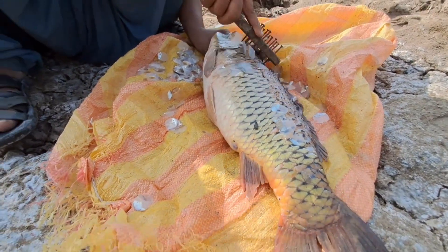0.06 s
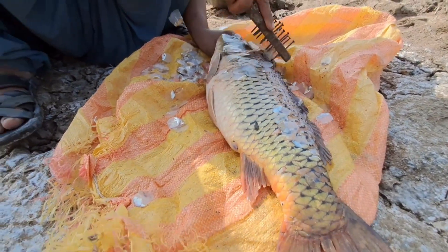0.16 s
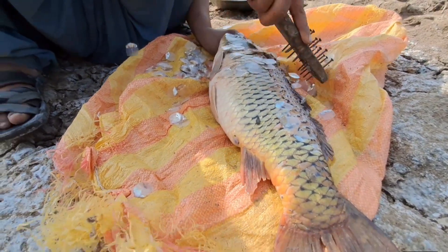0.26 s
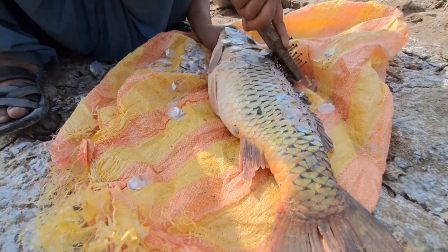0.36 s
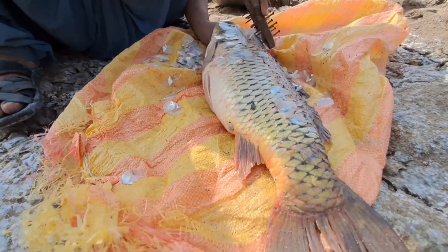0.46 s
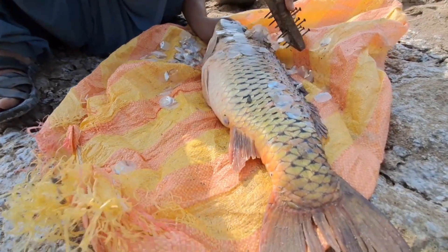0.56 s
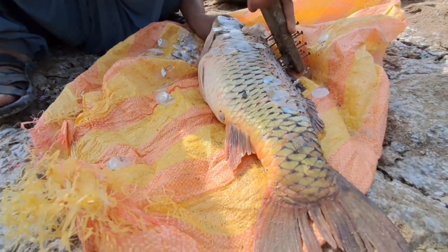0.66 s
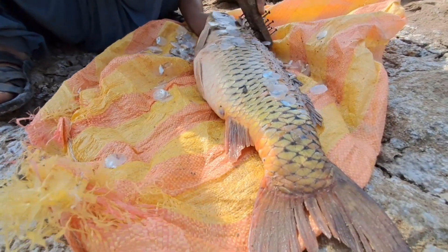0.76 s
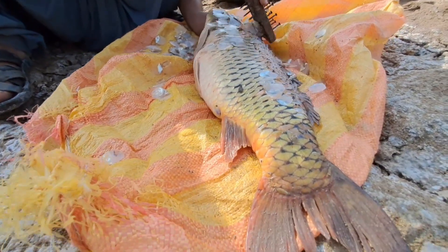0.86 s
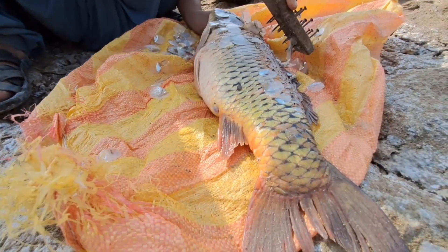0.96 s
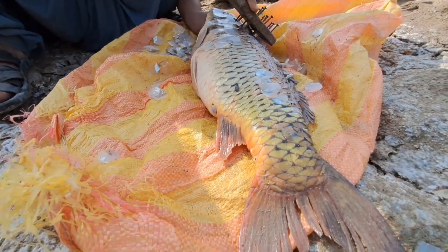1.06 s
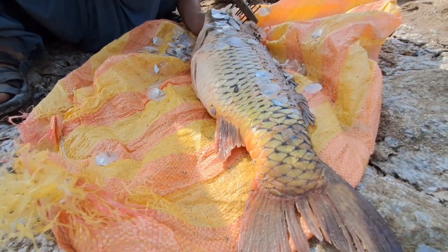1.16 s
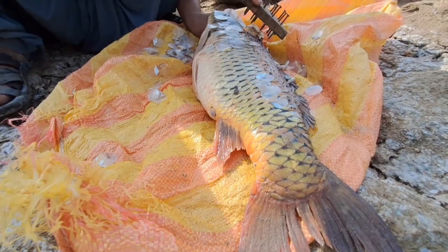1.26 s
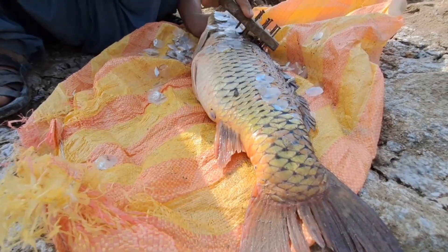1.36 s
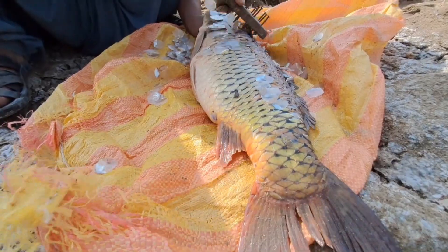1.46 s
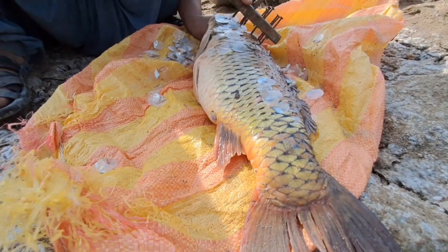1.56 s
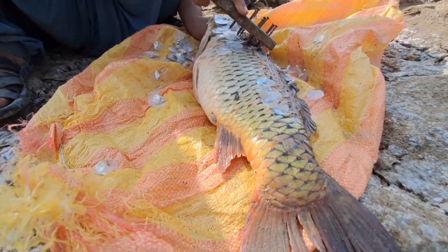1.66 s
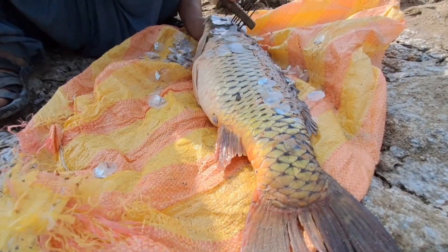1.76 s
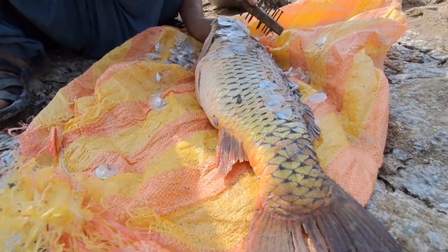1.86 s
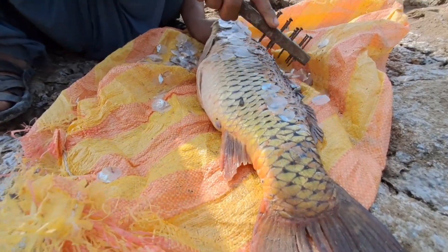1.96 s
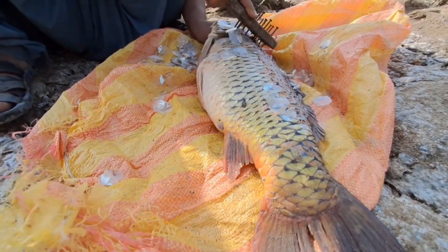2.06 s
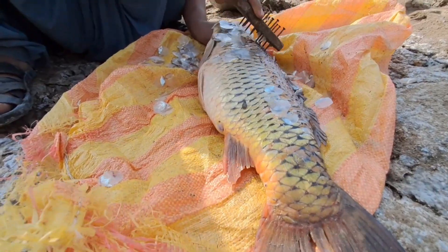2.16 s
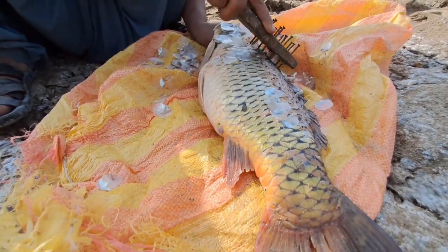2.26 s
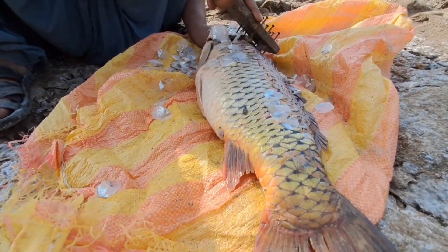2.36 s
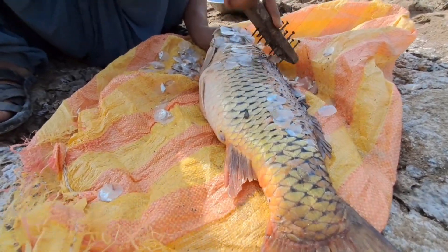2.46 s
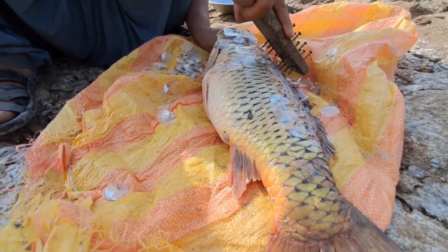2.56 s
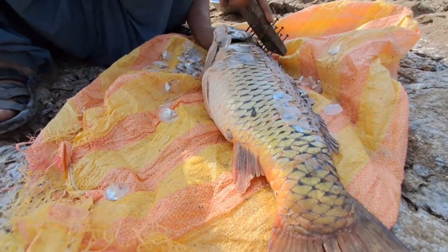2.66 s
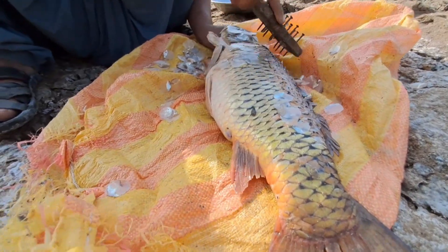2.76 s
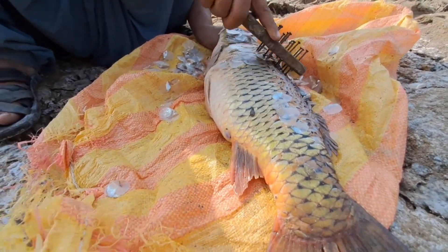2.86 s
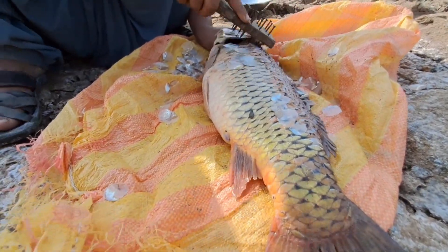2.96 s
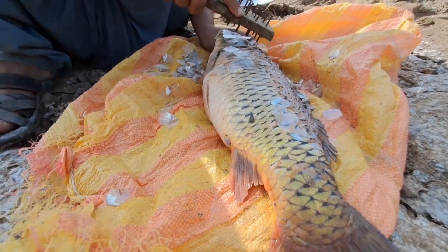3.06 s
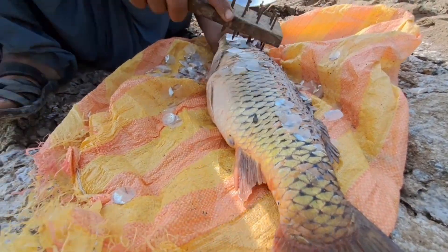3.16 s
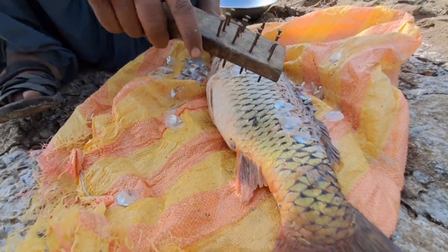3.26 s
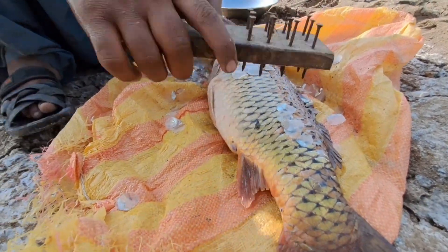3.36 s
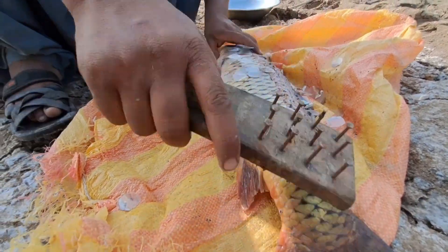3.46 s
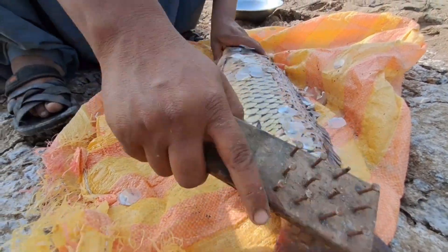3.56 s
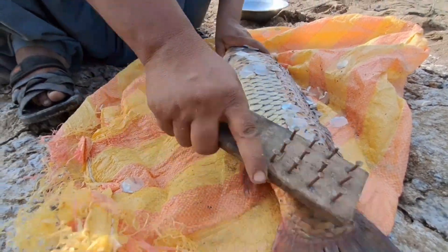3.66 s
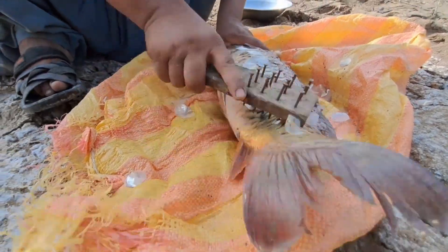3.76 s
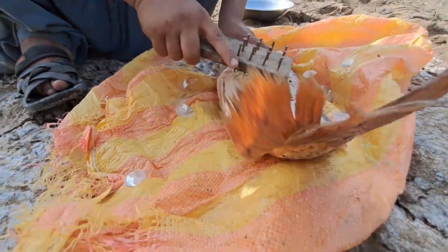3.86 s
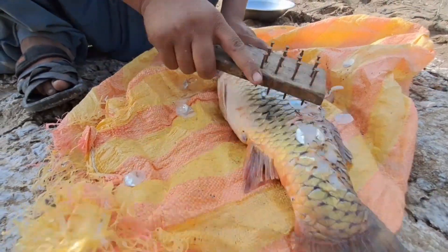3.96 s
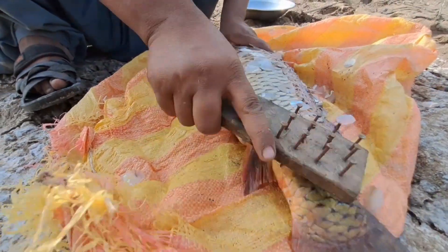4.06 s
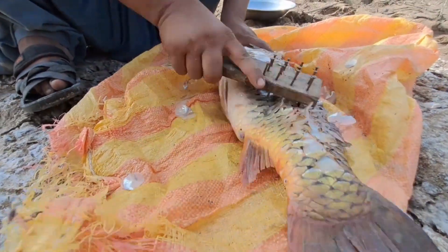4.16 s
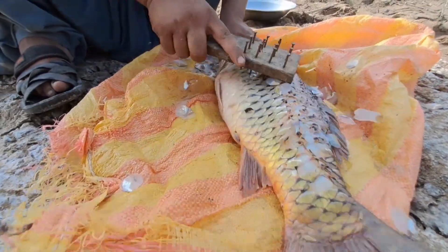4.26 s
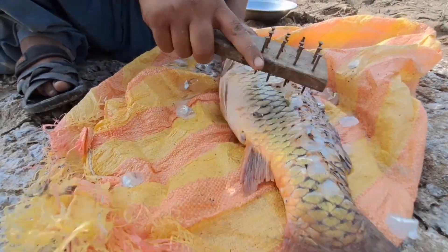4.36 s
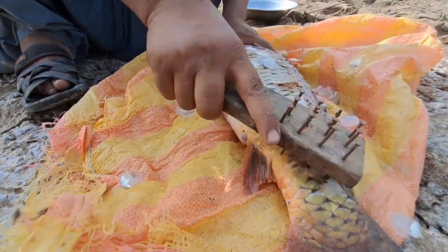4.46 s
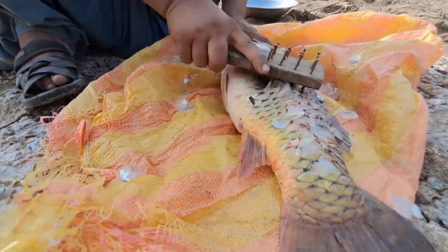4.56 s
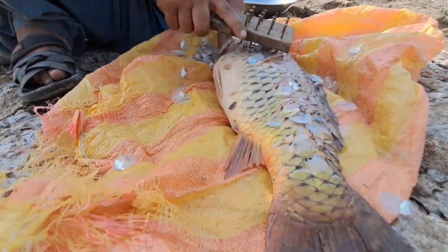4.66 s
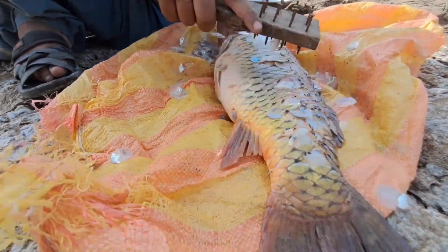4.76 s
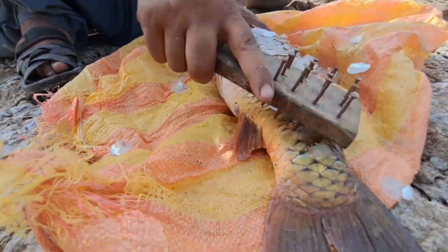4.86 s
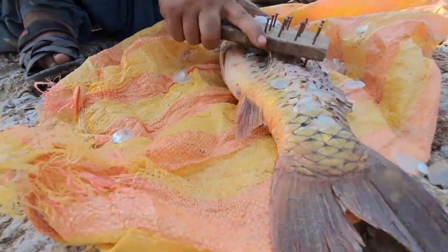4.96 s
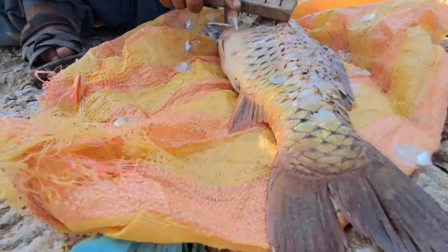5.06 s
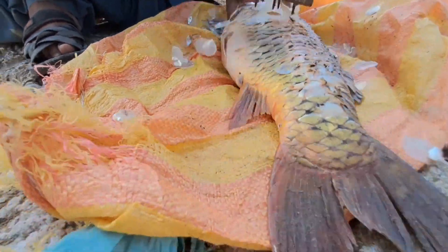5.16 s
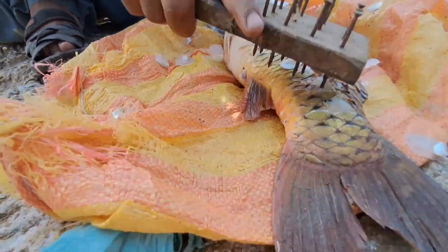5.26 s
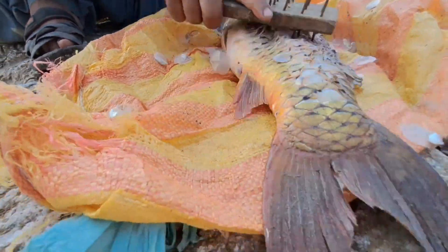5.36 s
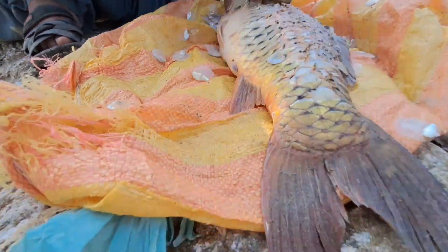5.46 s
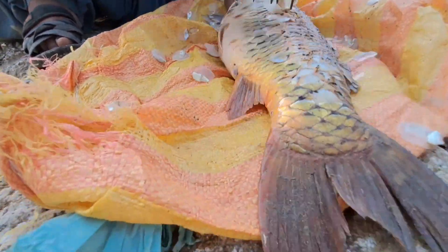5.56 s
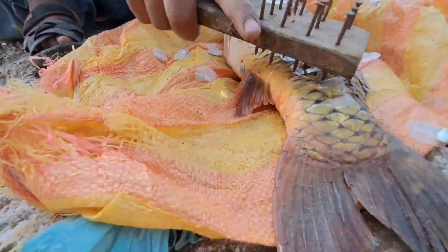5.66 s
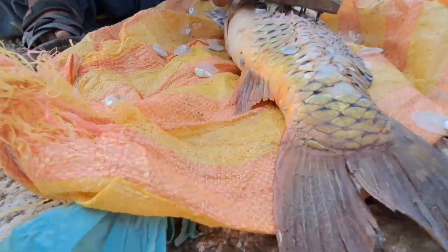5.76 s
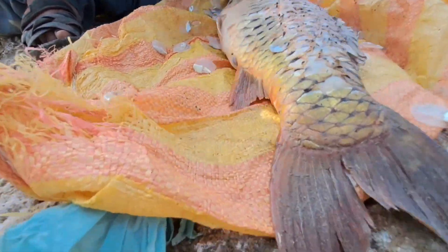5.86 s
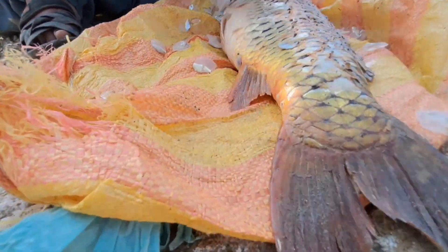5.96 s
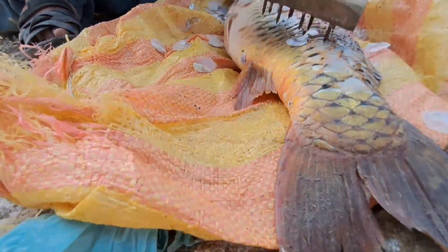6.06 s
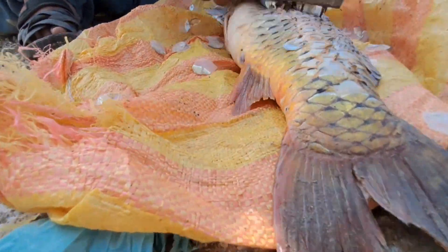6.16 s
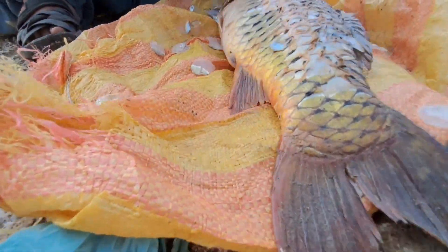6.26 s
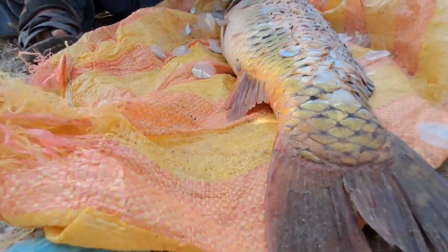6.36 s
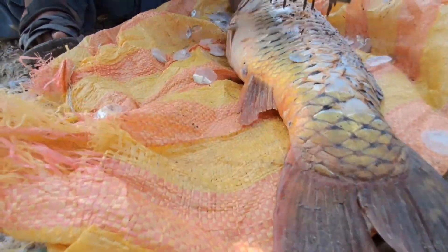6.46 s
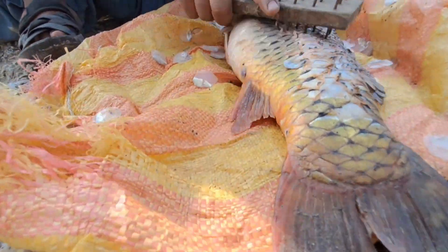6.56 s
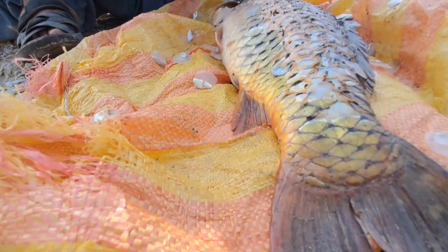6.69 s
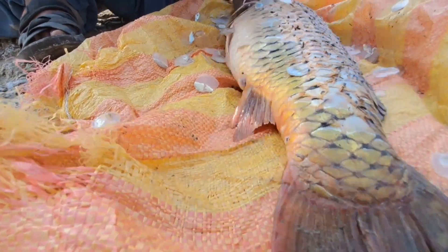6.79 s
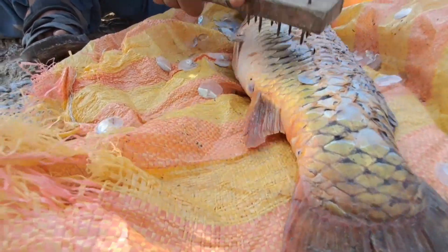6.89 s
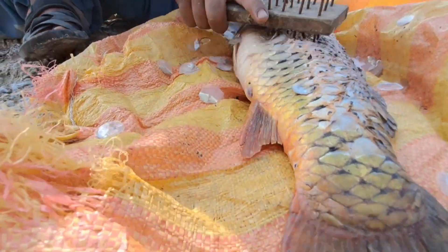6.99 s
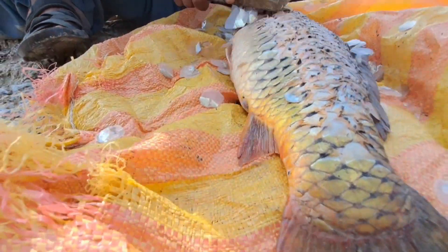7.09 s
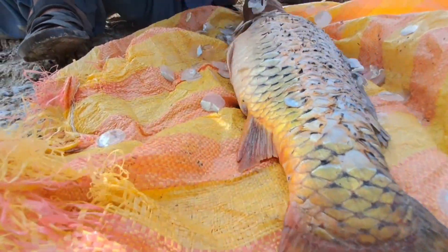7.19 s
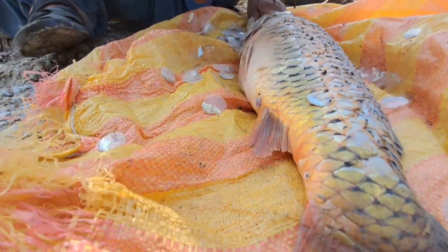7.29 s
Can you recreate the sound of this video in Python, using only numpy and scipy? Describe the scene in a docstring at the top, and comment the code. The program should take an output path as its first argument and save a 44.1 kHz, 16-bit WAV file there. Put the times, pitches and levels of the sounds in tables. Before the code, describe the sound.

A large fish is scaled outdoors with a wooden board set with nails. Quick, bright scraping strokes crackle right by the microphone, each with sharp snaps of scales and a dull bump of wood on flesh. The strokes stop for a moment, then carry on harder and slightly slower. Underneath are the faint rustle of a woven plastic sack, far-off birds and a thin hiss.

```python
"""Outdoors in an open yard, close to the microphone: a nail-studded board is dragged over a big carp lying on a
woven sack. Each stroke flicks up hundreds of stiff scales that crack and ring briefly, while the board knocks
and the soft body thuds under the nails. Between strokes the sack crinkles. Small birds chirp nearby, and others
chatter far off, over a low rumble and a thin hiss."""
import sys
import numpy as np
from scipy import signal
from scipy.fft import rfft, irfft
from scipy.io import wavfile
from scipy.ndimage import uniform_filter1d, map_coordinates

SR = 44100
rng = np.random.default_rng(int(sys.argv[2]) if len(sys.argv) > 2 else 0)


def write(x):
    x = np.atleast_2d(x).T
    wavfile.write(sys.argv[1], SR, np.round(np.clip(x, -1, 1) * 32767).astype(np.int16))


N = 323253
T = np.arange(N) / SR

# strokes of the board: start_s, bite_s, drag_s, lift_s, rasp_db, body_db, board_db, treble_db,
# left_minus_right_db, sack_db
BOARD_STROKES = [(0.0, 0.015, 0.078, 0.036, -27.5, -39.5, -32, -4.5, -1.5, -56),
                 (0.357, 0.0066, 0.1, 0.039, -31, -40.5, -38.5, 0.0, -1, -49.0),
                 (0.672, 0.029, 0.099, 0.014, -30, -41.0, -41.5, 1, -1, -53),
                 (1.015, 0.045, 0.079, 0.035, -30.0, -41, -41, 0.0, -1, -66),
                 (1.365, 0.026, 0.021, 0.027, -31, -39, -42, 0, -1, -45),
                 (1.651, 0.033, 0.076, 0.0075, -30.0, -39, -41, -1.5, -1, -67),
                 (2.001, 0.07, 0.0087, 0.053, -24, -34.0, -34, -3, -2.5, -58),
                 (2.28, 0.025, 0.043, 0.019, -32, -43.5, -44.5, -1.5, -1.5, -56.5),
                 (2.584, 0.03, 0.027, 0.0099, -29, -39, -47, -1, -1.5, -56),
                 (2.878, 0.062, 0.038, 0.022, -33.5, -41, -47, 4.5, -2, -65),
                 (3.659, 0.05, 0.12, 0.053, -22, -59, -79, -4.5, -1, -56),
                 (3.968, 0.012, 0.0042, 0.02, -29.5, -41, -29.5, 18, 1, -48),
                 (4.101, 0.044, 0.044, 0.056, -20, -40, -36, -3.5, -0.5, -67),
                 (4.501, 0.035, 0.095, 0.055, -21.5, -38.5, -35, -3, -1, -56.5),
                 (4.914, 0.035, 0.087, 0.051, -22, -36.5, -31.5, -2, -1, -52.5),
                 (5.309, 0.052, 0.063, 0.046, -21, -36.5, -32, 0, -0.5, -53.5),
                 (5.637, 0.0054, 0.02, 0.019, -38.5, -67.5, -60, 3.5, -1.5, -49),
                 (5.699, 0.05, 0.066, 0.13, -26, -37, -34, -1, -1.0, -66),
                 (6.111, 0.036, 0.15, 0.046, -26.5, -37, -34.5, -2.5, -1.0, -58),
                 (6.538, 0.033, 0.091, 0.11, -24.5, -37, -37, 0, -0.5, -48),
                 (6.934, 0.061, 0.064, 0.16, -23.5, -37, -35, -3.5, -1.5, -61.5)]
# big scales tearing loose: start_s, level_db, ring_hz
SCALE_SNAPS = [(.057, -19, 3100), (0.0842, -14.5, 3610), (.231, -46, 3100), (.3317, -30.5, 5340),
               (0.3721, -14, 5400), (0.4448, -10, 4740), (0.711, -24, 4800), (0.795, -13.5, 5550),
               (0.849, -30, 2950), (.858, -30, 3580), (0.8883, -28.5, 3080), (1.085, -16, 4150),
               (1.2586, -41, 3880), (1.4312, -22.5, 3540), (1.6631, -26, 4660), (1.7, -12.5, 3930),
               (1.753, -24, 3700), (2.008, -30, 3520), (2.033, -21, 4300), (2.0526, -14, 3220),
               (2.067, -14, 3060), (2.295, -26, 4700), (2.597, -23.5, 4800), (2.6204, -33, 4570),
               (2.6902, -14, 3430), (2.895, -25, 4500), (3.6275, -31, 3140), (3.7272, -8, 3200),
               (3.7373, -3.5, 4570), (3.7574, -10, 4360), (3.7921, -14, 4800), (3.83, -18, 3660),
               (3.9819, -22, 4420), (4.115, -16.5, 4560), (4.1807, -13.5, 4400), (4.2181, -7, 3500),
               (4.2787, -27, 3240), (4.583, -12, 4200), (4.619, -8, 3900), (4.7246, -33, 4020),
               (4.9312, -23, 4600), (5.023, -7.5, 3000), (5.073, -20, 2700), (5.3472, -30, 3100),
               (5.4991, -27.5, 4300), (5.647, -26, 5200), (5.8, -9.5, 4300), (5.824, -11.5, 4000),
               (5.8746, -7.5, 3330), (5.925, -30, 4570), (6.083, -30, 4900), (6.162, -12, 4800),
               (6.185, -9.5, 4430), (6.2105, -19, 3960), (6.2678, -15.5, 3980), (6.299, -20, 3800),
               (6.324, -18.5, 3900), (6.5685, -20, 3580), (6.5932, -14, 5010), (6.646, -6.5, 4070),
               (6.727, -16.5, 3810), (6.764, -26, 3900), (7.0031, -10.5, 3580), (7.0804, -10.5, 3940),
               (7.1041, -10, 5030), (7.113, -5.5, 3790), (7.143, -18.5, 4340), (7.164, -15.5, 4600),
               (7.184, -28, 3820)]
# spectrum of cracking scales: frequency_hz, level_db
SCALE_SPECTRUM = [(700, -30.5), (1300, -19.5), (2000, -22), (2750, -4.5), (3080, -2), (3700, -2.5),
                  (4900, -4), (5700, -5), (6500, -4.5), (7600, -9), (9400, -12), (11400, -10),
                  (12300, -6.5), (14000, -13), (16000, -13)]
# spectrum of the thudding body: frequency_hz, level_db
BODY_SPECTRUM = [(20, -36.5), (50, -3), (110, 0), (220, 1.5), (330, -4.5), (450, 1), (630, -5), (800, -6),
                 (1300, -18.5), (2200, -44.5), (4000, -38.5)]
# resonances of the wooden board: pitch_hz, width_hz, level_db
BOARD_MODES = [(1043, 400, 1), (1580, 220, -3.5), (2025, 300, 3), (2420, 83, 4)]
# the board bumping the wet flank: start_s, level_db, pitch_hz
FLANK_BUMPS = [(.085, -17.5, 262), (1.085, -19.5, 535), (1.406, -24, 538), (2.074, -18.5, 539),
               (2.347, -33, 400), (2.636, -22.5, 547), (2.969, -21, 527), (2.974, -23.5, 590),
               (3.736, -28.5, 200), (4.21, -32, 250), (4.32, -32.5, 820), (4.62, -21, 257),
               (5.036, -23, 250), (5.826, -23.5, 270), (5.872, -22.5, 292), (6.676, -20, 248),
               (6.727, -26.5, 387)]
# modes of the hollow flank: pitch_ratio, level_db, t60_s
FLANK_MODES = [(.45, -13, .03), (1, -1.5, 0.027), (1.2, -7, 0.037), (1.82, -5, .032)]
# the flank droning where the nails bite deep: centre_s, length_s, pitch_hz, level_db
FLANK_DRONES = [(5.757, 0.014, 410, -28.5), (6.17, 0.037, 580, -33), (6.584, 0.04, 570, -36.5),
                (7.004, 0.023, 555, -34.5)]
# brief pings of snapping scales, wet squeaks and faint low tones:
# start_s, length_s, start_hz, middle_hz, end_hz, level_db
SHORT_TONES = [(3.7262, 0.0067, 3300, 3020, 3140, -12), (4.279, 0.016, 3300, 3140, 3250, -39),
               (5.652, 0.023, 4250, 4980, 5100, -30), (6.938, 0.044, 3040, 3100, 2950, -32),
               (1.365, .13, 253, 214.6, 171, -40.5), (1.48, 0.14, 172, 148.6, 134, -52.5),
               (3.22, 0.24, 770, 730, 704, -75), (6.41, 0.097, 360, 381, 385, -57.5),
               (7.24, 0.11, 333, 344, 360, -61)]
# the sack shifting as the hands change their hold: centre_s, length_s, level_db
SACK_RUSTLES = [(3.212, 0.26, -61), (3.634, 0.09, -63), (4.313, 0.041, -45), (6.459, 0.22, -73)]
# harsh bird calls, far off: centre_s, length_s, pitch_hz, level_db
BIRD_CALLS = [(0.246, 0.29, 2770, -55), (0.509, 0.075, 2460, -48.5), (0.86, 0.13, 2116, -49.5),
              (0.995, 0.088, 3040, -54), (1.353, 0.099, 2776, -48), (1.511, 0.23, 2090, -50),
              (1.582, 0.23, 3106, -50.5), (1.846, 0.067, 2867, -50.5), (2.012, 0.16, 1926, -59),
              (2.157, 0.16, 2030, -53), (2.766, 0.074, 2340, -57), (3.019, 0.1, 2210, -61),
              (3.307, 0.2, 2490, -54), (3.554, .14, 2980, -56), (4.389, 0.16, 2466, -58.5),
              (4.87, 0.13, 3100, -67), (5.176, 0.14, 3160, -85), (6.057, 0.18, 1976, -61),
              (6.823, 0.19, 2400, -53.5)]
# small birds chirping: start_s, length_s, start_hz, middle_hz, end_hz, level_db
BIRD_CHIRPS = [(1.785, .044, 4700, 4480, 4300, -63), (2.495, .075, 2800, 4130, 3700, -60),
               (2.495, .075, 3800, 4800, 4350, -57), (4.81, .12, 4100, 4360, 4500, -66),
               (5.082, .06, 2750, 3900, 3450, -54), (6.87, .09, 4300, 4760, 4620, -57),
               (7.194, .066, 4950, 4100, 3720, -59)]
# spectrum of the low rumble: frequency_hz, level_db
RUMBLE_SPECTRUM = [(22, -24.5), (40, -9.5), (60, 3), (100, -7), (200, -16.5), (400, -28.5), (1000, -37),
                   (4000, -61)]
# spectrum of the thin hiss: frequency_hz, level_db
HISS_SPECTRUM = [(300, -11.5), (1200, -1), (2400, 0), (4000, -7.5), (7000, -7.5), (12500, -6.5),
                 (16000, -9)]
# ebb and return of the hiss: time_s, level_db
HISS_EBB = [(0.15, -66), (0.69, -59.5), (1.13, -71), (1.63, -72), (1.85, -85), (2.51, -61.5), (2.65, -68.5),
            (3.67, -67.5), (3.87, -58), (4.81, -68), (5.71, -58.5), (6.07, -65.5), (6.27, -59.5),
            (7.33, -65.5)]

TREBLE_COLUMN, BALANCE_COLUMN = 7, 8  # of BOARD_STROKES


def strokes(rows_per_s=44, row_sag_db=3, body_lag_s=0.008, growth_db_per_s=66):
    """Up close, nails rake rows of scales; the same catches shake board and flesh. Gives (rasp, knock)."""
    rasp_level = board_level = body_level = 0
    for start, bite, drag, lift, rasp_db, body_db, board_db, *_ in BOARD_STROKES:
        force = undb(press(start, bite, drag, lift))
        from_mid_drag_s = np.clip(T - start - bite - drag / 2, -bite - drag / 2, drag / 2)
        rasp_level += force * undb(rasp_db)
        # the board knocks harder as the drag goes on; the flesh gives a moment after the bite
        board_level += force * undb(board_db + growth_db_per_s * from_mid_drag_s)
        body_level += undb(body_db + press(start + body_lag_s, bite, drag, lift))
    catches = clicks(per_s=4000, spread_db=4) * undb(walk(190))
    rasp = scales(catches, ring_db=-6.5, t60=0.013)
    # a light, quick stroke sounds brighter
    dull = signal.sosfiltfilt(signal.butter(2, 5000, fs=SR, output="sos"), rasp)
    rasp = steady(dull + undb(grip(TREBLE_COLUMN)) * (rasp - dull), span_s=0.011)
    board = steady(wood(catches), span_s=0.17)
    body = steady(colour(catches, BODY_SPECTRUM), span_s=0.043)
    # the rasp jumps at each unevenly spaced row and sags until the next
    row_phase = np.cumsum(rows_per_s * np.exp(0.37 * walk(60))) / SR % 1
    row_gain = unit(undb(-row_sag_db * row_phase))
    return rasp_level * sticking() * rasp * row_gain, board_level * board + body_level * body


def press(start, bite, drag, lift, touch_s=0.0088, leave_s=0.0094):
    """Force of one stroke in dB: the nails touch, bite in, drag across the flank and lift off."""
    times = start + np.cumsum([-touch_s, touch_s, bite, drag / 2, drag / 2, lift, leave_s])
    return np.interp(T, times, [-60, -18.5, 0, 2, 0, -31, -60], left=-np.inf, right=-np.inf)


def grip(column):
    """A quality of how the board is held: steady through bite and drag, shifting between strokes."""
    return curve([(row[0] + late, row[column]) for row in BOARD_STROKES for late in (0, row[1] + row[2])])


def scales(catches, ring_db, t60, sizes=12):
    """Every catch cracks, tears for a moment, and rings one scale whose pitch depends on its size."""
    size = rng.integers(0, sizes, N)
    pitches = np.geomspace(3050, 5400, sizes)
    rings = sum(signal.oaconvolve(catches * (size == k), ring(hz, t60))[:N]
                for k, hz in enumerate(pitches))
    tearing = noise_tail(catches, t60=0.0026)
    cracks = colour(unit(catches) + undb(-2.5) * unit(tearing), SCALE_SPECTRUM)
    return unit(cracks) + undb(ring_db) * unit(rings)


def sticking(stick_s=0.009, dip_db=-4.5):
    """Gain of the rasp: it falters while a nail is held by a big scale about to snap."""
    held = np.zeros(N)
    for start, *_ in SCALE_SNAPS:
        add(held, start - stick_s, signal.windows.tukey(int(stick_s * SR), 0.5))
    return undb(dip_db * np.minimum(held, 1))


def snaps(crack_t60=0.0065, ring_t60=0.005):
    """A big scale strains and lets go with a crack and ring, jolting board and flesh. Gives (snap, jolt)."""
    cracks, rings = np.zeros(N), np.zeros(N)
    strain = fade(0.008)[::-1]
    envelope = np.concatenate([undb(-6) * strain, fade(crack_t60)])
    for start, db, hz in SCALE_SNAPS:
        add(cracks, start - len(strain) / SR, undb(db) * envelope * rng.choice([-1, 1], len(envelope)))
        add(rings, start, undb(db) * ring(hz, ring_t60))
    flutter = undb(-26) * noise_tail(rings, t60=0.07) / np.linalg.norm(fade(ring_t60))
    snap = undb(-1) * colour(cracks + flutter, SCALE_SPECTRUM) + undb(-8) * rings
    jolt = undb(0.5) * wood(cracks) + undb(-15) * colour(cracks, BODY_SPECTRUM)
    return snap, jolt


def wood(knocks):
    """Knocks heard through the board's resonances."""
    return highs(sum(undb(db) * band(knocks, hz, width) for hz, width, db in BOARD_MODES), 1200)


def bumps():
    """Short hollow slaps of wood on wet flesh."""
    out = np.zeros(N)
    for start, db, hz in FLANK_BUMPS:
        for ratio, mode_db, t60 in FLANK_MODES:
            add(out, start, undb(db + mode_db) * ring(hz * ratio, t60))
    return out


def drones(width_hz=170):
    """Catches of the nails keep the belly's hollow ringing for a moment."""
    out = np.zeros(N)
    catches = clicks(per_s=2400, spread_db=5)
    for centre, length, hz, db in FLANK_DRONES:
        hollow = band(band(catches, hz, width_hz), hz, 2 * width_hz)
        swell = np.exp(-2 * ((T - centre) / length) ** 2)
        out += undb(db) * swell * steady(hollow, span_s=0.023)
    return out


def glides(table, waver, flutter_db):
    """Short unsteady tones that swell and bend through three pitches."""
    out = np.zeros(N)
    bend = 1 + waver * walk(300)
    flutter = undb(flutter_db * walk(260))
    for start, length, *pitches, db in table:
        progress = np.linspace(0, 1, int(length * SR))
        at = (int(start * SR) + np.arange(len(progress))) % N
        hz = np.polyval(np.polyfit([0, 0.5, 1], pitches, 2), progress) * bend[at]
        swell = np.sqrt(progress * (1 - progress)) * flutter[at]
        add(out, start, undb(db) * unit(swell * np.sin(2 * np.pi * np.cumsum(hz) / SR)))
    return out


def sack(rest_db=-72.5, settle_lag_s=0.063, pull_db_per_s=114.5, settle_db_per_s=140):
    """Under the fish, woven plastic crinkles as each stroke pulls it and lets it settle."""
    power = undb(rest_db) ** 2  # it never lies quite still
    for start, bite, drag, *_, db in BOARD_STROKES:
        since_peak = T - (start + bite + drag + settle_lag_s)
        power += undb(db - np.maximum(-pull_db_per_s * since_peak, settle_db_per_s * since_peak)) ** 2
    for centre, length, db in SACK_RUSTLES:
        power += undb(db) ** 2 * np.exp(-(2 * (T - centre) / length) ** 2)
    ticks = clicks(per_s=1100, spread_db=0.5)
    crinkle = scales(ticks, ring_db=-14, t60=0.005)
    pats = undb(-17) * unit(colour(ticks, BODY_SPECTRUM))  # wet scales landing
    loose_scales = undb(-4) * unit(colour(clicks(per_s=16, spread_db=3), SCALE_SPECTRUM))
    return (steady(crinkle + pats, span_s=0.066) + loose_scales) * np.sqrt(power)


def chatter(width_hz=1080, flutter_db=6, sink=0.082):
    """Birds far off: each harsh call is a rough tone that sinks, smeared by the way it travels."""
    out = np.zeros(N)
    noise = rng.standard_normal(N) + 1j * rng.standard_normal(N)
    rough = signal.sosfilt(signal.butter(2, width_hz / 2, fs=SR, output="sos"), noise)
    rough *= undb(flutter_db * walk(70))
    for centre, length, hz, db in BIRD_CALLS:
        n = int(1.5 * length * SR)  # room for the fades
        phase = 2 * np.pi * np.cumsum(hz * (1 + sink * np.linspace(1, -1, n))) / SR
        call = np.real(np.roll(rough, -int(centre * SR))[:n] * np.exp(1j * phase))
        add(out, centre - n / SR / 2, undb(db) * unit(call) * signal.windows.tukey(n, 2 / 3))
    return out


def outdoors():
    """All around: a low rumble, much alike left and right, under a thin hiss that ebbs and returns."""
    mid = colour(rng.standard_normal(N), RUMBLE_SPECTRUM)
    side = undb(-11) * colour(rng.standard_normal(N), RUMBLE_SPECTRUM)
    rumble = np.array([mid + side, mid - side]) * undb(0.91 * walk(3.355))
    hiss = np.array([colour(rng.standard_normal(N), HISS_SPECTRUM) for _ in range(2)])
    hiss *= undb(curve(HISS_EBB) + walk(1.8))
    return undb(-52) * rumble + undb(4) * hiss


def reflections(x, db, t60, low_hz, paths):
    """Reflections, different at each microphone port; several paths trade strength as the source moves."""
    decay, treble = fade(t60), highs(x, low_hz)
    tails = rng.standard_normal((paths, 2, len(decay))) * decay / np.linalg.norm(decay)
    shares = np.array([walk(160) for _ in range(paths)])
    shares /= np.linalg.norm(shares, axis=0)
    return undb(db) * sum(signal.oaconvolve((treble * share)[None], tail, axes=1)[:, :N]
                          for share, tail in zip(shares, tails))


def microphone(x, lag_s, sway):
    """Sound reaches the left port first; the lag shifts as the hand moves."""
    lag = lag_s * SR * (1 + sway * walk(7))
    return np.array([x, map_coordinates(x, [np.arange(N) - lag], order=2)])


def undb(db):
    """Decibels to gain."""
    return 10 ** (np.asarray(db) / 20)


def unit(x):
    """Scale to rms 1."""
    return x / np.sqrt(np.mean(x ** 2) + 1e-20)


def steady(x, span_s):
    """Hold the mean power at 1 over a span; single grains stay uneven."""
    power = np.abs(uniform_filter1d(x ** 2, int(span_s * SR)))
    return x / np.sqrt(power + 1e-4 * np.mean(x ** 2))


def curve(points):
    """Straight lines through (time_s, value) points."""
    return np.interp(T, *np.transpose(points))


def add(out, start_s, sound):
    """Mix a sound in at a time."""
    i = max(int(start_s * SR), 0)
    out[i:i + len(sound)] += sound[:max(N - i, 0)]


def colour(x, spectrum, size=2048):
    """Minimum-phase filter through (frequency_hz, level_db) points; keeps the power of white noise."""
    hz, db = np.transpose(spectrum)
    bins_hz = np.maximum(np.fft.rfftfreq(size, 1 / SR), 1)
    gain = undb(np.interp(np.log(bins_hz), np.log(hz), db))
    cepstrum = irfft(np.log(gain))
    cepstrum[1:size // 2] *= 2
    cepstrum[size // 2 + 1:] = 0
    response = irfft(np.exp(rfft(cepstrum)))
    return signal.fftconvolve(x, response / np.linalg.norm(response))[:len(x)]


def band(x, hz, width_hz):
    """One resonance, gain 1 at its centre."""
    return signal.lfilter(*signal.iirpeak(hz, hz / width_hz, SR), x)


def highs(x, hz):
    """What lies above a frequency."""
    return signal.sosfilt(signal.butter(2, hz, "high", fs=SR, output="sos"), x)


def fade(t60):
    """Exponential decay, down 60 dB in t60 seconds."""
    return np.exp(-np.log(1000) * np.arange(int(t60 * SR) + 2) / (t60 * SR))


def ring(hz, t60):
    """A struck mode."""
    decay = fade(t60)
    return decay * np.sin(2 * np.pi * hz * np.arange(len(decay)) / SR)


def noise_tail(x, t60):
    """Noise that follows the power of a sound and dies away after it."""
    power = np.abs(signal.oaconvolve(x ** 2, fade(t60) ** 2)[:N])
    return np.sqrt(power) * rng.standard_normal(N)


def walk(rate_hz):
    """Smooth random drift with a spread near 1."""
    step = int(SR / rate_hz)
    return unit(uniform_filter1d(np.repeat(rng.standard_normal(N // step + 1), step), step)[:N])


def clicks(per_s, spread_db):
    """Random impulses of unequal size."""
    hits = rng.random(N) < per_s / SR
    return hits * rng.choice([-1, 1], N) * undb(spread_db * rng.standard_normal(N))


def scene():
    """The fish close to the microphone, a little to the left; small birds chirping nearby, others chattering
    far off across the yard."""
    rasp, knock = strokes()
    snap, jolt = snaps()
    short_tones = glides(SHORT_TONES, waver=0.035, flutter_db=5)
    skin = rasp + snap + sack() + short_tones
    flesh = knock + jolt + bumps() + drones()
    near = microphone(skin, lag_s=0.0002352, sway=0.17) + microphone(flesh, lag_s=0.00015, sway=0.19)
    # ground and body throw the sound back at once, the open yard barely at all
    near += reflections(skin + flesh, db=-1.5, t60=0.003, low_hz=1430, paths=14)
    near += reflections(skin + flesh, db=-20, t60=0.16, low_hz=500, paths=2)
    near *= undb(np.array([[0.5], [-0.5]]) * grip(BALANCE_COLUMN))
    chirps = glides(BIRD_CHIRPS, waver=0.016, flutter_db=4)
    calls = undb(0.5) * chatter()
    yard = reflections(calls + undb(-6) * chirps, db=-0.5, t60=0.16, low_hz=790, paths=1)
    return undb(-0.3) * near + chirps + undb(-7) * calls + yard + outdoors()


def record(dry):
    """The recorder clips at full scale and cuts the top above 15.9 kHz."""
    top_cut = signal.ellip(10, 0.2, 70, 15900, fs=SR, output="sos")
    return signal.sosfilt(top_cut, np.clip(dry, -1, 1))


dry = scene()
out = record(dry)
write(out)
```